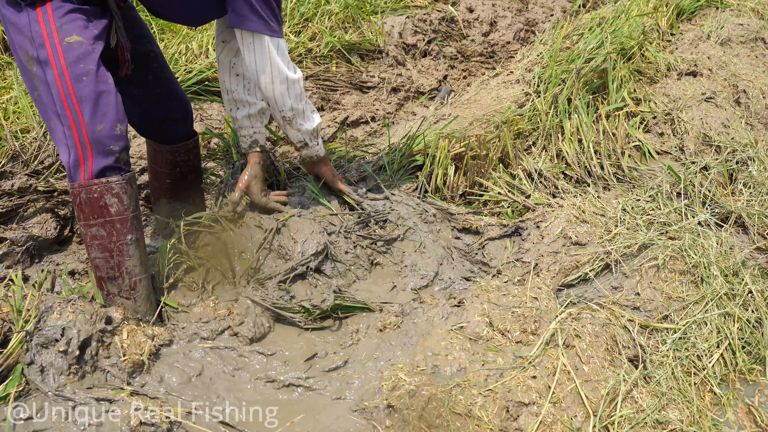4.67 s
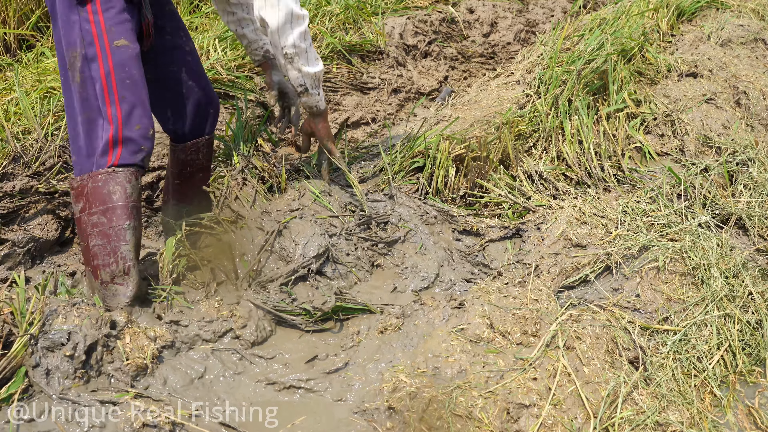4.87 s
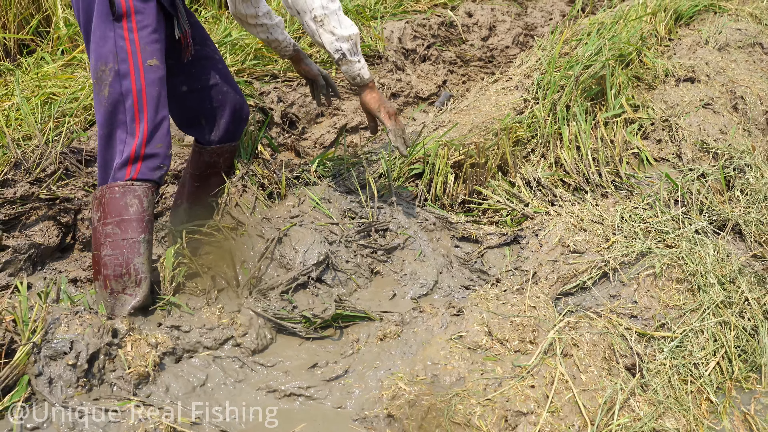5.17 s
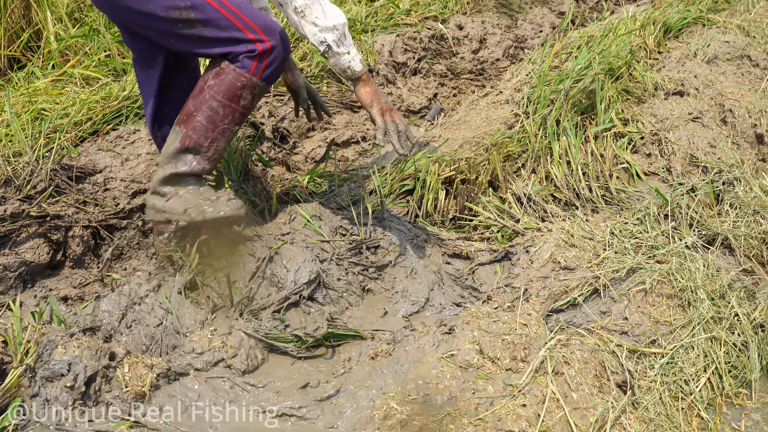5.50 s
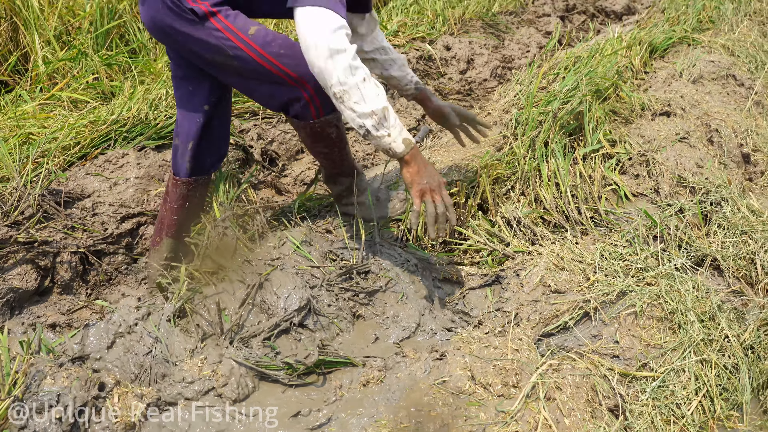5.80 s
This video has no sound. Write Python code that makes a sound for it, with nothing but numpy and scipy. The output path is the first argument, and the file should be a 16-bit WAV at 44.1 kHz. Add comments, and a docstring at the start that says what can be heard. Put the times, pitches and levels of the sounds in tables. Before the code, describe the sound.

Wet rice stalks rustle as they are dragged through squelching mud, then a boot sloshes in shallow water, with wind buffeting the microphone.

```python
"""Wind thuds and wet straw rustles: someone drags a bundle through a waterlogged rice field.
With each pull, stalks slide and crack, mud films tear and spit, gaps suck shut, air pockets plop.
Near the end a boot sloshes through shallow water, and the air trapped under it gulps.
Gusts buffet the two microphone ports over a faint low hum, crop hiss and far insects. No echo."""
import sys
import numpy as np
from scipy import signal
from scipy.fft import rfft, irfft, next_fast_len
from scipy.io import wavfile
from scipy.ndimage import uniform_filter1d, map_coordinates

SR = 44100
rng = np.random.default_rng(int(sys.argv[2]) if len(sys.argv) > 2 else 0)


def wav_out(sig):
    """Save sig, one row per channel (or a flat mono array), as 16-bit PCM at SR to the path in sys.argv[1]."""
    wavfile.write(sys.argv[1], SR, np.round(np.clip(np.atleast_2d(sig).T, -1, 1) * 32767).astype(np.int16))


N = 266231
TIME_S = np.arange(N) / SR

# Source spectra. Each row: frequency in Hz, relative density in dB.
FIELD_SPECTRUM = [(30, 4), (100, 5), (220, -3.5), (600, -4), (1400, -25.5), (4000, -22.5), (8000, -30),
                  (15000, -42)]
WIND_SPECTRUM = [(15, 0), (30, -7.5), (70, 5), (115, -1), (170, -10.5), (260, -22), (400, -30.5),
                 (900, -47.5)]
SPRAY_SPECTRUM = [(600, -5), (1000, -0.5), (1450, -3), (1950, 4), (3000, 2.5), (4400, 2), (6500, -4),
                  (8000, -4.5), (10500, -19), (15000, -15)]
WATER_SPECTRUM = [(150, -3), (300, 0), (410, -5), (530, 1), (640, 4), (780, -12), (1010, 4.5), (1250, -16),
                  (1600, -4.5), (3000, -48)]
MUD_SPECTRUM = [(500, -24), (900, -2.5), (1400, 0), (2100, 0), (3500, 1.5), (6000, -4), (9000, -8.5),
                (15000, -24)]
STRAW_SPECTRUM = [(800, -64), (2000, -0.5), (3500, -2.5), (5500, 0), (8000, -0.5), (10500, -3.5),
                  (15500, -5)]

# Levels below are relative; each source adds its own trim. Pan is left minus right.
# Low hum. Each row: time in seconds, pitch in Hz, level in dB.
HUM_TRACK = [(3.0, 91.94, -69), (3.1, 90.2, -46), (3.2, 88, -52), (3.29, 91.6, -39.5), (3.37, 90.4, -46),
             (3.45, 79.9, -53), (3.7, 68.78, -62), (4.7, 70, -60), (5.1, 70, -73)]
# Breeze between gusts. Each row: time in seconds, level in dB.
BREEZE_LEVELS = [(0.0, -56), (1.3, -52), (1.95, -53), (2.8, -43), (3.3, -44), (3.7, -52.5), (4.7, -56),
                 (5.5, -49.5), (6.0, -57)]
# Veering of the breeze. Each row: time in seconds, phase lead of the left port in radians.
WIND_PHASE_LEAD = [(0.1, 4.86), (0.7, 0.42), (1.3, 2.27), (1.55, 0.1), (2.1, 2), (2.8, 1.46), (3.3, 3.8),
                   (3.9, 3.4), (4.2, 1.25), (4.6, 4.8), (6.0, 3.33)]
# Gusts on the ports. Each row: peak time in seconds, level in dB, length in seconds.
GUSTS = [(0.068, -34, 0.14), (0.316, -41, 0.078), (0.4, -40, 0.045), (0.65, -46.5, 0.05),
         (0.752, -40, 0.042), (0.884, -36.5, 0.077), (0.996, -39, 0.029), (1.122, -36, 0.079),
         (1.256, -36, 0.089), (1.372, -34.5, 0.052), (1.452, -39, 0.04), (1.537, -35, 0.062),
         (1.633, -36, 0.032), (1.71, -41.5, 0.051), (1.812, -42.5, 0.038), (1.977, -51, 0.056),
         (2.121, -33, 0.057), (2.197, -35, 0.035), (2.341, -39, 0.047), (2.413, -29.5, 0.031),
         (2.49, -38.5, 0.04), (2.613, -34, 0.05), (2.696, -34.5, 0.088), (2.883, -34, 0.077),
         (3.053, -36, 0.054), (3.144, -38, 0.05), (4.178, -40.5, 0.063), (5.14, -39.5, 0.074),
         (5.292, -39, 0.09), (5.52, -40.5, 0.089), (5.678, -34.5, 0.063), (5.756, -35.5, 0.071),
         (5.854, -36, 0.042), (6.03, -38, 0.038)]
# Strongest eddies. Each row: time in seconds, level in dB, pitch in Hz.
EDDIES = [(0.02, -29, 145), (0.05, -27.5, 114), (0.085, -29, 102), (0.898, -30, 111), (1.073, -28, 104),
          (1.292, -22, 116), (1.453, -34.5, 167), (1.516, -26, 105), (1.576, -25, 98), (2.133, -24, 109),
          (2.191, -28, 173), (2.395, -29.5, 116), (2.615, -25.5, 118), (2.658, -25, 90.43),
          (2.695, -24, 79.5), (4.198, -35, 71.6), (5.579, -26.5, 108), (5.672, -24.5, 115)]
# Air trapped under the boot. Each row: time in seconds, pitch in Hz, level in dB.
GULP_TRACK = [(5.215, 430, -60), (5.243, 370.6, -44), (5.265, 272, -38), (5.28, 204, -33),
              (5.295, 229.5, -52), (5.342, 323, -37), (5.358, 300, -40), (5.372, 325, -43.5),
              (5.39, 337, -42.5), (5.41, 330, -66)]
# Boot slosh. Each row: time in seconds, then spray, air cavity and surge levels in dB.
SLOSH_LEVELS = [(5.19, -50.5, -53, -73), (5.23, -46.5, -49.5, -41), (5.263, -34.5, -41, -34.5),
                (5.273, -28.5, -26.5, -31.5), (5.30, -25.5, -27.5, -34), (5.323, -24.5, -27, -36),
                (5.331, -30.5, -36, -32.5), (5.36, -46.5, -62, -57), (5.42, -43, -70, -49)]
# Air cavity around the boot. Each row: resonance in Hz, width in Hz, gain in dB.
CAVITY_MODES = [(530, 37, -1), (559, 35, 6), (598, 37, 10), (670, 32, -4), (770, 45, -15), (884, 24, 0)]
# Air pockets opening. Each row: peak time in seconds, level in dB, pitch in Hz,
# nominal length in seconds.
AIR_POCKETS = [(0.511, -38.5, 580, 0.0053), (0.986, -50.5, 986, 0.011), (1.14, -48, 598, 0.007),
               (1.15, -35.5, 1470, 0.003), (1.738, -30, 616, 0.003), (1.74, -36.5, 221, 0.0074),
               (1.825, -43.5, 660, 0.012), (1.978, -35, 634, 0.009), (2.056, -44.5, 945, 0.0073),
               (2.136, -44.5, 975, 0.0071), (2.274, -47.5, 1007, 0.007), (2.742, -27, 250, 0.0042),
               (2.82, -44.5, 234, 0.0067), (2.978, -35, 1830, 0.006), (3.065, -43.5, 184.7, 0.016),
               (3.068, -48, 510, 0.021), (3.098, -50, 451, 0.015), (3.135, -46, 184, 0.017),
               (3.188, -41, 980, 0.006), (3.297, -48.5, 550, 0.019), (3.353, -50.5, 560, 0.019),
               (3.5, -52, 546, 0.011), (3.916, -45, 1480, 0.0054), (5.079, -40.5, 1097, 0.0071),
               (5.096, -45, 1097, 0.0093), (5.128, -43, 1096, 0.008), (5.185, -34.5, 589, 0.0064),
               (5.508, -33.5, 1220, 0.0058), (5.528, -38, 660, 0.0046), (5.544, -36, 635, 0.0052),
               (5.563, -25.5, 609, 0.0035), (5.619, -22, 549, 0.0042), (5.63, -31.5, 657, 0.005),
               (5.649, -36, 1295, 0.0066)]
# Gaps sucking shut. Each row: peak time in seconds, level in dB, start and end pitch in Hz,
# length in seconds, pan in dB.
CLOSING_GAPS = [(3.075, -50.5, 481, 620, 0.03, 2), (3.114, -43.5, 2090, 2490, 0.015, -3),
                (4.203, -39, 1785, 2140, 0.011, -2), (5.522, -42, 1700, 2130, 0.011, 5),
                (5.538, -43, 803, 1090, 0.016, 0), (5.655, -44.5, 1360, 1910, 0.013, 4)]
# Loudest mud films tearing. Each row: peak time in seconds, level in dB, centre in Hz,
# width in octaves, nominal length in seconds, pan in dB.
FILM_TEARS = [(0.193, -38, 1730, 2, 0.017, -2), (0.224, -35, 2010, 2, 0.004, -4),
              (0.612, -47.5, 1050, 0.56, 0.016, 0), (0.655, -39, 2000, 1.7, 0.0052, -6),
              (0.694, -41.5, 1520, 1.7, 0.012, -3), (0.772, -38, 1500, 2.5, 0.0034, -2),
              (0.808, -37, 1500, 1.6, 0.0057, -5), (1.152, -38.5, 900, 2.4, 0.0046, 0),
              (1.2, -47, 2000, 1.1, 0.0044, 0), (1.547, -39.5, 3300, 0.46, 0.0079, 5),
              (1.585, -36.5, 5900, 0.5, 0.0068, 1), (1.607, -39, 6600, 1, 0.0066, 3),
              (1.672, -39, 2900, 1.6, 0.0063, 0), (1.722, -41, 2980, 0.7, 0.0057, -5),
              (1.737, -31, 1150, 1.4, 0.0034, -1), (1.757, -37.5, 377, 1.8, 0.0098, -2),
              (1.81, -53, 620, 0.51, 0.043, 0), (1.866, -43.5, 1050, 0.62, 0.019, 1),
              (1.971, -33.5, 2200, 0.73, 0.0095, 0), (1.98, -37, 2800, 1.8, 0.0038, 5),
              (2.018, -41, 1570, 0.68, 0.0097, 0), (2.02, -50.5, 560, 0.35, 0.023, 0),
              (2.047, -35, 7000, 1.8, 0.003, 2), (2.059, -34, 3500, 1.3, 0.014, 3),
              (2.185, -38, 11000, 1.5, 0.016, 0), (2.236, -37, 1300, 1.2, 0.0061, -1),
              (2.274, -39.5, 4200, 0.92, 0.0056, 1), (2.6, -42, 2740, 1.35, 0.016, 2),
              (2.913, -47, 5000, 2.1, 0.004, -5), (2.978, -37, 1720, 1.1, 0.0054, -1),
              (3.016, -39, 1600, 1.3, 0.0056, 1), (3.032, -36.5, 1740, 1.3, 0.0055, -1),
              (3.05, -42, 1500, 1.4, 0.03, -2), (3.061, -42, 1900, 0.63, 0.0065, -3),
              (3.085, -53, 260, 1.2, 0.044, 2), (3.131, -42.5, 6950, 0.53, 0.013, -2),
              (3.166, -44, 1450, 0.8, 0.005, -4), (3.188, -46, 1500, 0.9, 0.005, 0),
              (3.297, -44, 3300, 0.43, 0.013, -1), (3.335, -48, 990, 0.55, 0.02, 0),
              (3.565, -44, 2050, 0.36, 0.005, 0), (3.342, -42, 6520, 0.51, 0.0069, -1),
              (3.578, -44, 9300, 0.6, 0.0037, -2), (3.658, -49, 1690, 0.62, 0.017, 0),
              (3.717, -48, 1300, 0.6, 0.005, 9.5), (3.925, -42, 8593, 3.7, 0.0058, -2),
              (4.051, -38.5, 2080, 1.4, 0.0063, -4), (4.08, -36.5, 2300, 1.8, 0.0081, -5),
              (4.099, -35, 1460, 1.36, 0.012, -3.5), (4.198, -41, 1800, 1.5, 0.006, -1),
              (4.263, -39.5, 1610, 1.4, 0.0094, -2), (4.494, -49.5, 910, 1.4, 0.0054, -2),
              (5.125, -48.5, 2194, 1.2, 0.007, 13), (5.322, -29, 1300, 2.2, 0.0075, -1),
              (5.35, -38, 850, 0.8, 0.007, 2), (5.375, -35.5, 2930, 1.3, 0.007, 4),
              (5.469, -39, 3980, 2.2, 0.0096, 4), (5.534, -32, 8550, 0.6, 0.0032, 1),
              (5.538, -40, 1100, 0.69, 0.012, 5), (5.551, -38.5, 2100, 1.15, 0.0098, 4),
              (5.563, -37, 1140, 0.61, 0.003, 7), (5.65, -39, 4300, 2.3, 0.013, 4),
              (5.798, -34.5, 2360, 1.4, 0.014, 0), (5.98, -36, 2180, 0.4, 0.011, 1),
              (6.015, -27.5, 2390, 1.55, 0.006, 6)]
# Stalks cracking. Each row: time in seconds, level in dB, centre in Hz, pan in dB.
STALK_CRACKS = [(0.655, -35, 3300, -5), (0.751, -32, 5500, -1), (0.806, -37, 3500, 1),
                (0.910, -34, 3670, -3), (1.335, -31.5, 3760, 0), (2.232, -34, 2630, 2),
                (3.68, -49, 5000, 1), (4.046, -37, 3000, -5), (5.015, -50, 7040, 3), (5.674, -29, 5100, 6)]
# Top treble of the straw hiss. Each row: time in seconds, gain in dB.
STRAW_TREBLE = [(0.1, 5.5), (1.3, 1.5), (1.65, -3), (1.92, 0), (2.12, -3), (2.5, 1.5), (2.62, -1),
                (2.76, -4), (3.2, 0), (4.4, 2), (5.8, -1.5)]
# Pulls of the bundle. Each row: start, hardest moment and end in seconds, straw, mud and water
# levels in dB, slack at both ends in dB, straw pan in dB.
PULLS = [(0.013, 0.107, 0.19, -45.5, -45.5, -54.5, 10.5, -4), (0.23, 0.262, 0.36, -44, -47, -54.5, 6.5, -4),
         (0.391, 0.385, 0.53, -43, -42, -55, 4, -7), (0.575, 0.75, 0.99, -46, -44.5, -53.5, 2.5, -6.5),
         (1.052, 1.11, 1.226, -46, -44, -51, 3.5, -5.5), (1.21, 1.276, 1.417, -42, -44.5, -50.5, 8, -2.5),
         (1.48, 1.942, 2.386, -32, -40, -48, 14, -0.5), (2.287, 2.34, 2.53, -46, -48.5, -62.5, 2.5, 2),
         (2.595, 2.61, 2.77, -57, -45.5, -56.5, 9.5, 2), (2.68, 2.776, 2.92, -54.5, -51, -64, 4, 2),
         (2.927, 3.08, 3.36, -55, -45, -50.5, 3.5, -7), (3.214, 3.29, 3.464, -51, -43.5, -50, 3, -1),
         (3.44, 3.463, 3.73, -49, -46.5, -53, 12.5, 0), (4.034, 4.056, 4.26, -49.5, -44.5, -52, 4, -6.5),
         (4.256, 4.43, 4.61, -46.5, -50.5, -59, 8.5, -3), (4.611, 4.793, 5.12, -55, -52, -57, 4.5, 2),
         (5.252, 5.314, 5.33, -39, -39, -43, 9, -2), (5.38, 5.46, 5.75, -49.5, -47.5, -49.5, 1.5, 5),
         (5.765, 5.79, 6.02, -43.5, -42.5, -49, -0.5, -2)]


def undb(db):
    """Decibels to gain."""
    return 10 ** (np.asarray(db) / 20)


def curves(table):
    """Each column after the first, interpolated over time."""
    times_s, *columns = np.transpose(table)
    return [np.interp(TIME_S, times_s, column) for column in columns]


def unit(x):
    """Scale to rms 1."""
    return x / np.sqrt(np.mean(x ** 2) + 1e-18)


def place(db, pan_db):
    """Left and right gains for a level and a pan."""
    side = undb(np.array([pan_db, -pan_db]) / 2).reshape(2, -1)
    return undb(db) * side / np.sqrt(np.mean(side ** 2, axis=0))


def ports(x, lead_rad):
    """One pressure wave meets the two ports at different phases."""
    wave = signal.hilbert(x, next_fast_len(N))[:N]
    return np.array([wave.real, (wave * np.exp(-1j * lead_rad)).real])


def shape(x, gain_at):
    """Filter by gain_at(hz); rms 1."""
    n = x.shape[-1]
    size = next_fast_len(n)
    hz = np.maximum(np.arange(size // 2 + 1) * SR / size, 1)
    return unit(irfft(rfft(x, size) * gain_at(hz), size)[..., :n])


def colour(x, spectrum):
    """Filter by a spectrum table, rolling off below its first row."""
    points_hz, db = np.transpose(spectrum)

    def gain_at(hz):
        low_cut = np.sqrt(1 + (points_hz[0] / 2 / hz) ** 4)
        return undb(np.interp(np.log(hz), np.log(points_hz), db)) / low_cut
    return shape(x, gain_at)


def band(x, centre_hz, octaves):
    """Band-pass with steep skirts."""
    return shape(x, lambda hz: 1 / np.sqrt(1 + (2 * np.log2(hz / centre_hz) / octaves) ** 6))


def walk(rate_hz):
    """Smooth random drift; rms 1."""
    hold = max(int(SR / rate_hz), 1)
    steps = rng.standard_normal(N // 32)
    return unit(uniform_filter1d(steps[(np.arange(N) // hold) % len(steps)], hold))


def read_at(x, positions):
    """Resample both channels at fractional positions."""
    return np.array([map_coordinates(port, [positions], mode="mirror") for port in x])


def waver(x, depth, rate_hz):
    """Resonances drift by a fraction as their pocket changes shape."""
    drift = walk(rate_hz)
    return read_at(x, np.arange(N) + depth * np.cumsum(drift - drift.mean()))


def crackle(per_s, spread_db, shared):
    """Tiny snaps of unequal size; a share of the power reaches both ports alike."""
    hits = rng.random((3, N)) < per_s / SR
    sizes = undb(spread_db * np.minimum(rng.exponential(size=(3, N)), 4))
    snaps = hits * sizes * rng.standard_normal((3, N))
    return np.sqrt(1 - shared) * snaps[:2] + np.sqrt(shared) * snaps[2]


def patchy(x, depth_db, rate_hz, octaves):
    """Each contact briefly favours its own pitch region, so bands flicker apart."""
    hz, times_s, cells = signal.stft(x, SR, nperseg=256)
    grid = np.meshgrid(np.log2(1 + hz / 400) / octaves, times_s * rate_hz, indexing="ij")
    flicker = map_coordinates(rng.standard_normal((64, 1024)), grid, order=1, mode="wrap")
    return unit(signal.istft(cells * undb(depth_db * flicker), SR)[1][:, :N])


def around(length_s):
    """Seconds from a burst's peak, five lengths each way."""
    half = int(5 * length_s * SR)
    return np.arange(-half, half + 1) / SR


def swell(t, length_s, tail):
    """Envelope peaking at t = 0; tail > 1 lengthens the fall and shortens the rise."""
    stretch = np.where(t > 0, tail, 1 / tail)
    return 1 / np.cosh(np.clip(2 * t / length_s / stretch, -50, 50))


def excerpt(x, start_s, n):
    """n samples from start_s, wrapping round."""
    return np.take(x, int(start_s * SR) + np.arange(n), axis=1, mode="wrap")


def add(out, centre_s, burst):
    """Mix in a burst, centred on centre_s."""
    start = int(centre_s * SR) - burst.shape[-1] // 2
    first, last = max(start, 0), min(start + burst.shape[-1], N)
    out[:, first:last] += burst[:, first - start:last - start]


def bubbles(per_s, low_hz, high_hz, cycles, spread_db, rise):
    """Small bubbles ring briefly, rise in pitch and reach the ports out of step."""
    out = np.zeros((2, N))
    for when, pitch, strength, left, right in rng.random((int(per_s * N / SR), 5)):
        hz = low_hz * (high_hz / low_hz) ** pitch
        length_s = cycles / hz
        t = around(length_s)
        turns = np.cumsum(hz * (1 + rise * np.tanh(t / length_s))) / SR
        ring = np.sin(2 * np.pi * (turns + np.array([[left], [right]])))
        gain = undb(-spread_db * np.log(max(strength, .03)))
        add(out, when * N / SR, ring * swell(t, length_s, tail=1.15) * gain)
    return unit(out)


def effort_db(layer, rest_db, follows, grip_db_per_s=342, release_db_per_s=148):
    """A layer's level as pulls grip, peak and let go; it follows a share of the slack and fade."""
    level_db = np.full(N, float(rest_db))
    for start_s, hardest_s, end_s, straw_db, mud_db, water_db, slack_db, _ in PULLS:
        peak_db = {"straw": straw_db, "mud": mud_db, "water": water_db}[layer]
        slack = np.interp(TIME_S, [start_s, hardest_s, end_s], [1, 0, 1]) ** 0.61  # sharp peak
        fade_db = grip_db_per_s * np.maximum(start_s - TIME_S, 0)
        fade_db += release_db_per_s * np.maximum(TIME_S - end_s, 0)
        level_db = np.maximum(level_db, peak_db - follows * (slack_db * slack + fade_db))
    return level_db


def field():
    """Faint steady crop hiss and a thin band of far insects."""
    crop = colour(rng.standard_normal((2, N)), FIELD_SPECTRUM)
    insects = band(rng.standard_normal((2, N)), centre_hz=5650, octaves=0.075)
    return crop * undb(-54) + insects * undb(-70 + 3 * walk(6))


def hum(octave_db=-11):
    """An unsteady low tone and its octave swell briefly, then sink in pitch."""
    hz, db = curves(HUM_TRACK)
    phase = 2 * np.pi * np.cumsum(hz * (1 + 0.022 * walk(24.92))) / SR
    tone = unit(np.sin(phase) + undb(octave_db) * np.sin(2 * phase))
    return ports(tone, lead_rad=1.43) * undb(db + 1.5 * walk(13))


def wind():
    """Gusts buffet the ports over a light rumble; strong eddies give single soft thuds."""
    breeze_db, = curves(BREEZE_LEVELS)
    lead_rad, = curves(WIND_PHASE_LEAD)
    power = undb(breeze_db) ** 2
    for at_s, db, length_s in GUSTS:
        power += undb(db) ** 2 * 0.5 ** ((2 * (TIME_S - at_s) / length_s) ** 2)
    air = colour(rng.standard_normal((3, N)), WIND_SPECTRUM)
    rumble = ports(air[2], lead_rad) + 0.56 * air[:2]
    out = rumble * np.sqrt(power) * undb(2.45 * walk(32) - 0.9)
    for at_s, db, hz in EDDIES:
        t = around(1 / hz)
        thud = np.cos(2 * np.pi * hz * t - np.array([[0], [lead_rad[int(at_s * SR)]]]))
        add(out, at_s, thud * swell(t, 0.57 / hz, tail=1.63) * undb(db + 2))
    return out


def boot_gulp():
    """Trapped air rings: the pitch falls as the boot sinks and rises as the hole refills."""
    hz, db = curves(GULP_TRACK)
    ring = np.sin(2 * np.pi * np.cumsum(hz * (1 + 0.0708 * walk(160))) / SR)
    sounding = (TIME_S > GULP_TRACK[0][0]) & (TIME_S < GULP_TRACK[-1][0])
    return ports(ring, lead_rad=0.65) * undb(db + 2.9 * walk(120) + 1.5) * sounding


def boot_slosh():
    """The boot shoves water aside: a spray of drops, a ringing air cavity, a low surge."""
    def cavity_gain(hz):
        return sum(undb(db) / (1 + 2j * (hz - mode_hz) / width_hz)
                   for mode_hz, width_hz, db in CAVITY_MODES)
    spray_db, cavity_db, surge_db = curves(SLOSH_LEVELS)
    drops = crackle(per_s=16000, spread_db=2.5, shared=0.047)
    drops = patchy(drops, depth_db=0.5, rate_hz=70, octaves=0.135)
    spray = colour(drops, SPRAY_SPECTRUM) * place(spray_db, pan_db=3.3)
    ring = shape(crackle(per_s=4800, spread_db=-0.5, shared=0.98), cavity_gain)
    ring = waver(ring, depth=0.018, rate_hz=30)
    ring = band(ring, centre_hz=685, octaves=0.84)  # mud walls damp all but the resonances
    cavity = ring * place(cavity_db, pan_db=1.7)
    flow = band(rng.standard_normal(N), centre_hz=236, octaves=1.24)
    surge = ports(flow, lead_rad=-2.17) * undb(surge_db)
    moving = (TIME_S > SLOSH_LEVELS[0][0]) & (TIME_S < SLOSH_LEVELS[-1][0])
    return uniform_filter1d(moving.astype(float), size=800) * (spray + cavity + surge)


def water(level_db):
    """Muddy water gurgles: a churn of heavily damped bubbles, a few ringing longer."""
    churn = colour(crackle(per_s=1200, spread_db=2.5, shared=0.16), WATER_SPECTRUM)
    churn = waver(churn, depth=0.04, rate_hz=12)
    gurgle = bubbles(per_s=55, low_hz=451, high_hz=1280, cycles=6, spread_db=2.5, rise=0.0607)
    return (churn + undb(-6) * gurgle) * undb(level_db + 2.2 * walk(35) - 1.8)


def plops(rise=0.0577, right_lag_s=0.00024, roughness=0.24):
    """Air pockets ring, rising in pitch as they open; torn mud roughens the ring."""
    out = np.zeros((2, N))
    tearing = rng.standard_normal((2, N))
    for (at_s, db, hz, length_s), start_turn in zip(AIR_POCKETS, rng.random(len(AIR_POCKETS))):
        t = around(length_s)
        turns = start_turn + np.cumsum(hz * (1 + rise * np.tanh(t / length_s))) / SR
        ring = np.sin(2 * np.pi * (turns - np.array([[0], [hz * right_lag_s]])))
        ring *= swell(t, 0.74 * length_s, tail=0.77)
        splatter = band(excerpt(tearing, at_s, len(t)), 0.89 * hz, octaves=1.77)
        splatter *= swell(t, length_s, tail=1.77)
        add(out, at_s, (ring + roughness * splatter) * place(db + 4, pan_db=1))
    return out


def slurps():
    """Air is drawn through closing gaps in the mud: rough resonances that climb."""
    out = np.zeros((2, N))
    air = crackle(per_s=9000, spread_db=-0.5, shared=0.31)
    for at_s, db, from_hz, to_hz, length_s, pan_db in CLOSING_GAPS:
        t = around(length_s)
        ring = band(excerpt(air, at_s, 2 * len(t)), from_hz, octaves=0.65)
        speed = np.interp(t, [-length_s, length_s], [1, to_hz / from_hz])
        climb = read_at(ring, np.cumsum(speed))
        add(out, at_s, unit(climb * swell(t, length_s, tail=1)) * place(db - 6.5, pan_db))
    return out


def lesser_tears(mud_db, per_s=16, centre_hz=3300, octaves=0.89, length_s=0.0045):
    """Rows like FILM_TEARS for films that tear by chance, as loudly as the mud is worked."""
    count = int(per_s * N / SR)
    draws = rng.standard_normal((count, 3))
    rows = []
    for i, (strength, pitch, side) in zip(rng.integers(N, size=count), draws):
        hz = centre_hz * 2 ** (0.9 * np.clip(pitch, -2, 1))
        rows.append((i / SR, mud_db[i] - 2 + 0.5 * strength, hz, octaves, length_s, 4 * side))
    return rows


def squelches(mud_db):
    """Mud films tear: brief spits of crackle, pitched by the gaps they open."""
    out = np.zeros((2, N))
    spit = crackle(per_s=16000, spread_db=0, shared=0.12)
    spit = patchy(spit, depth_db=4.5, rate_hz=70, octaves=0.2114)
    for at_s, db, hz, octaves, length_s, pan_db in list(FILM_TEARS) + lesser_tears(mud_db):
        t = around(length_s)
        tear = band(excerpt(spit, at_s, len(t)), hz, octaves)
        burst = unit(tear * swell(t, 1.28 * length_s, tail=1.18))
        add(out, at_s, burst * place(db - 9, pan_db))
    return out


def mud(level_db):
    """Small films burst in clusters under pressure; tiny bubbles ring among them."""
    films = crackle(per_s=5000, spread_db=1.5, shared=0.067)
    films = colour(patchy(films, depth_db=4.5, rate_hz=75, octaves=0.221), MUD_SPECTRUM)
    fizz = bubbles(per_s=220, low_hz=1443, high_hz=4520, cycles=8.99, spread_db=2.5, rise=0.0417)
    return (films + undb(-11) * fizz) * place(level_db + 0.7 * walk(45) - 0.8, pan_db=1)


def lesser_cracks(straw_db, per_s=8, centre_hz=5000):
    """Rows like STALK_CRACKS for fibres that give by chance, as loudly as the straw is pulled."""
    count = int(per_s * N / SR)
    samples = rng.integers(N, size=count)
    draws = np.clip(rng.standard_normal((count, 3)), -2, 1)
    return [(i / SR, straw_db[i] + 2 + 1.5 * strength, centre_hz * 2 ** (pitch / 2), 4 * side)
            for i, (strength, pitch, side) in zip(samples, draws)]


def cracks(straw_db, rise_s=0.0028, decay_s=0.004):
    """Stalks give way: dry snaps that die within milliseconds."""
    out = np.zeros((2, N))
    events = list(STALK_CRACKS) + lesser_cracks(straw_db)
    t = around(decay_s)
    envelope = np.exp(np.minimum(t / rise_s, -t / decay_s))
    fibres = crackle(per_s=14000, spread_db=2.5, shared=0.42)
    for at_s, db, hz, pan_db in events:
        snap = band(excerpt(fibres, at_s, len(t)), hz, octaves=1.35)
        add(out, at_s, unit(snap * envelope) * place(db - 11.5, pan_db))
    return out


def straw(level_db, treble_hz=9500, snaps_db=-12):
    """Wet stalks slide over each other: a fine hiss of tiny catches, with distinct snaps."""
    pan_db, = curves([(hardest_s, pan) for _, hardest_s, *_, pan in PULLS])
    treble_db, = curves(STRAW_TREBLE)
    catches = crackle(per_s=11000, spread_db=0, shared=0.013)
    catches = patchy(catches, depth_db=3.3, rate_hz=55, octaves=0.16)
    snaps = crackle(per_s=380, spread_db=0.5, shared=0.45)
    snaps = patchy(snaps, depth_db=5, rate_hz=120, octaves=0.3)
    hiss = colour(catches + undb(snaps_db) * snaps, STRAW_SPECTRUM)
    treble = signal.sosfiltfilt(signal.butter(2, treble_hz, "high", fs=SR, output="sos"), hiss)
    rustle = hiss + (undb(treble_db) - 1) * treble
    return rustle * place(level_db + 1.05 * walk(35) + 3, pan_db)


def scene():
    """Straw, mud, water and boot close by, over the open-air background."""
    straw_db = effort_db("straw", rest_db=-63, follows=0.99)
    mud_db = effort_db("mud", rest_db=-56.5, follows=0.53)
    water_db = effort_db("water", rest_db=-62.5, follows=0.65)
    wet = mud(mud_db) + water(water_db) + squelches(mud_db) + slurps() + plops()
    boot = boot_slosh() + boot_gulp()
    stalks = straw(straw_db) + cracks(straw_db)
    return wet + boot + stalks + wind() + hum() + field()


def record(dry, cutoff_hz=15850):
    """The camera's steep low-pass cuts the top treble."""
    return signal.sosfilt(signal.ellip(10, .2, 80, cutoff_hz, fs=SR, output="sos"), dry)


dry = scene()
out = record(dry)
wav_out(out)
```